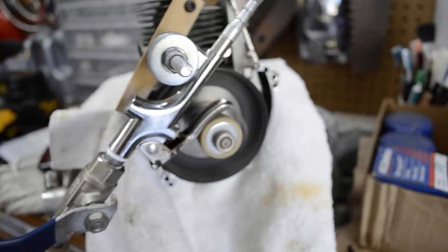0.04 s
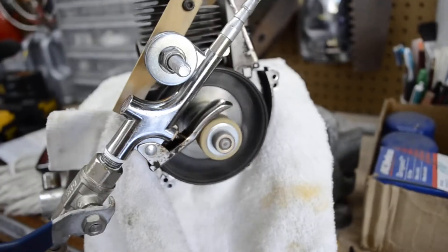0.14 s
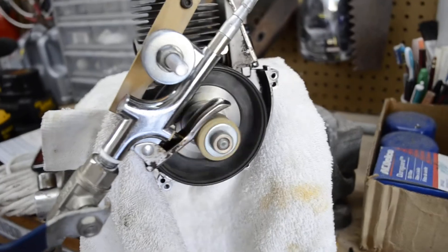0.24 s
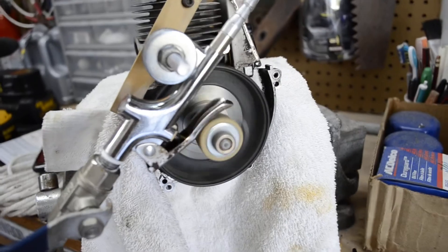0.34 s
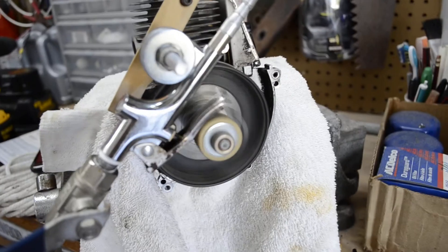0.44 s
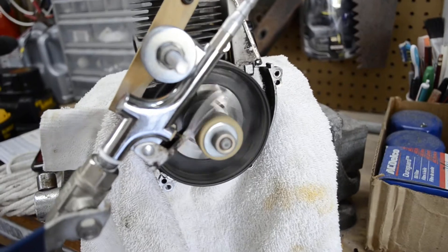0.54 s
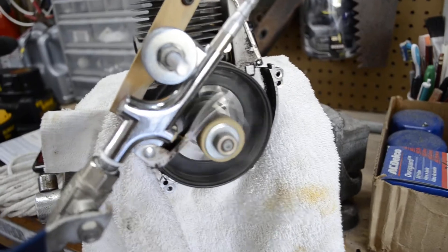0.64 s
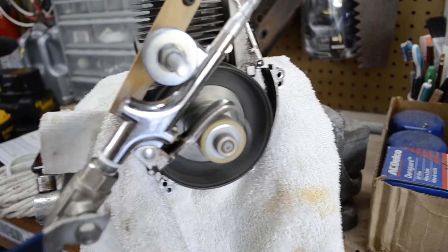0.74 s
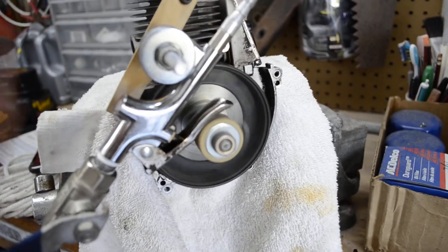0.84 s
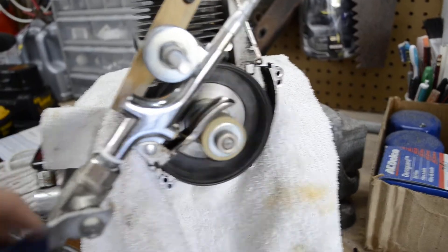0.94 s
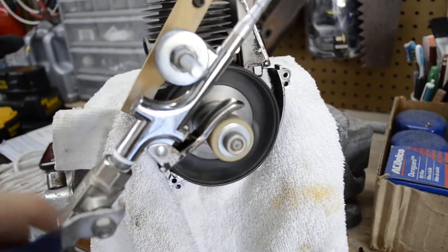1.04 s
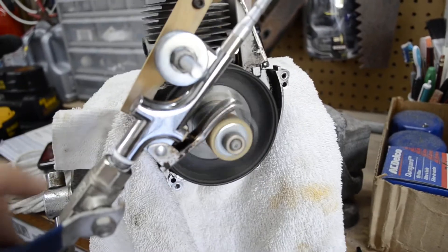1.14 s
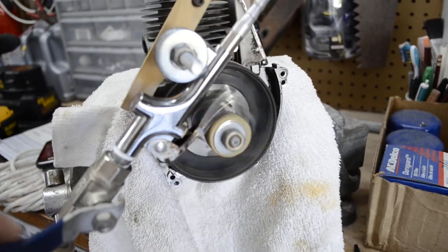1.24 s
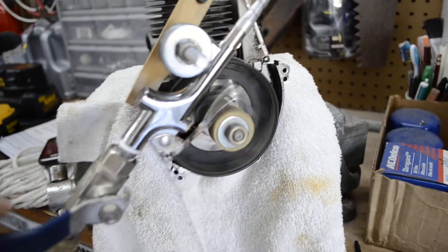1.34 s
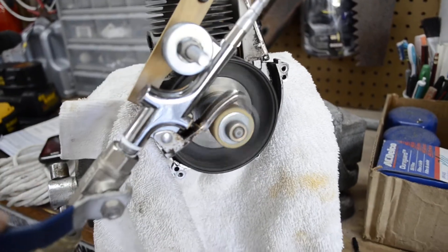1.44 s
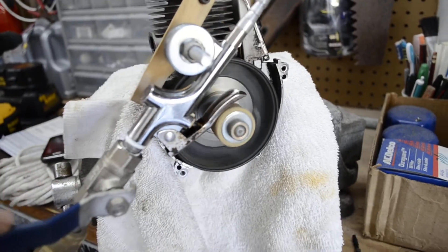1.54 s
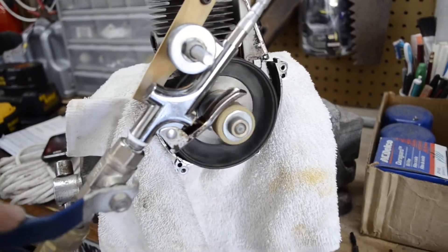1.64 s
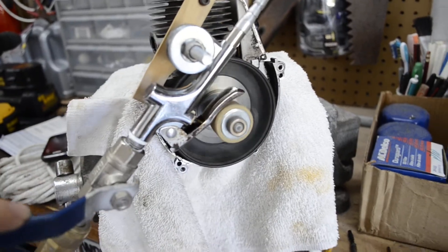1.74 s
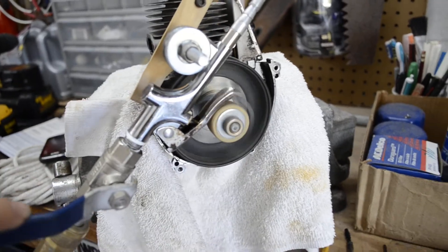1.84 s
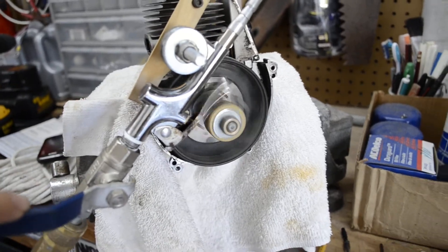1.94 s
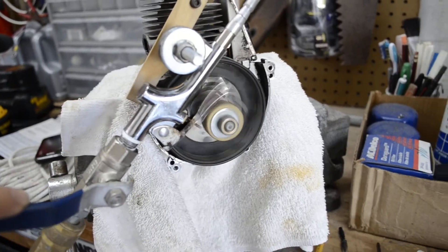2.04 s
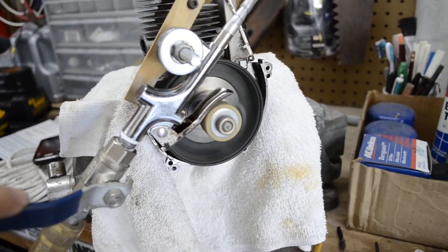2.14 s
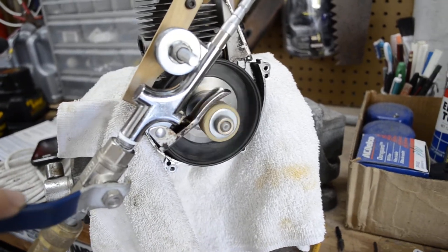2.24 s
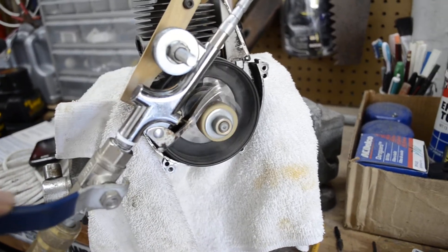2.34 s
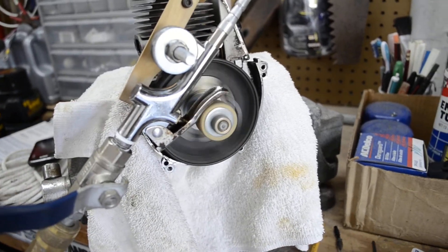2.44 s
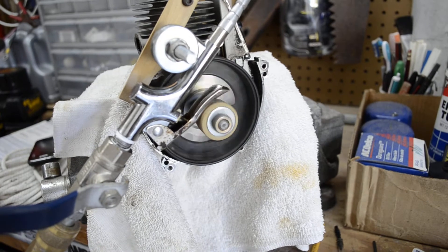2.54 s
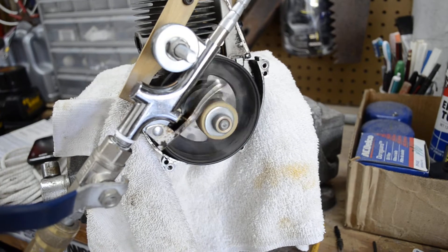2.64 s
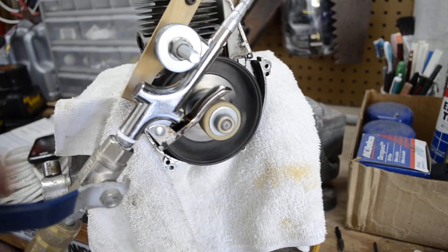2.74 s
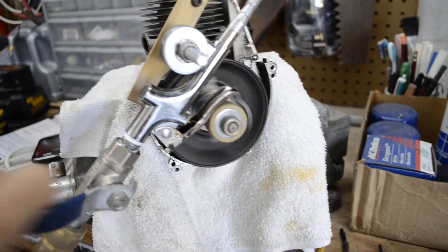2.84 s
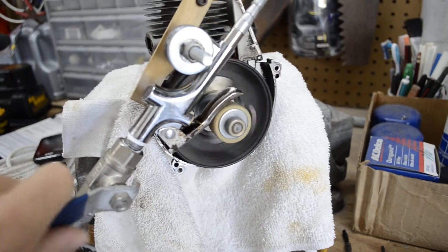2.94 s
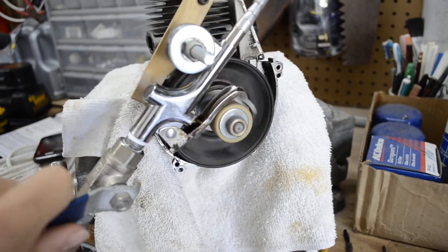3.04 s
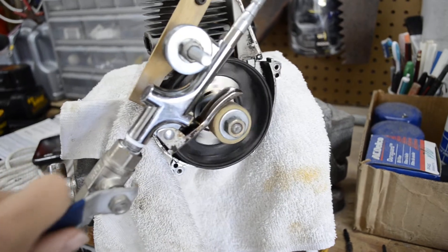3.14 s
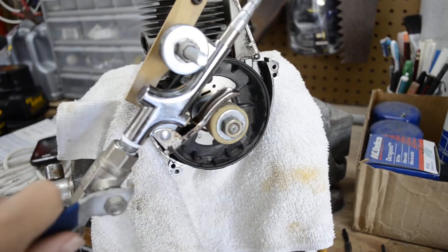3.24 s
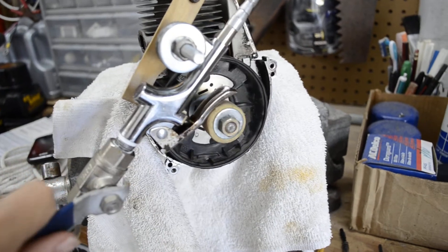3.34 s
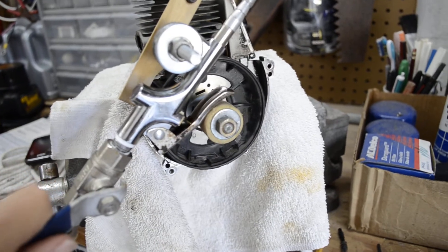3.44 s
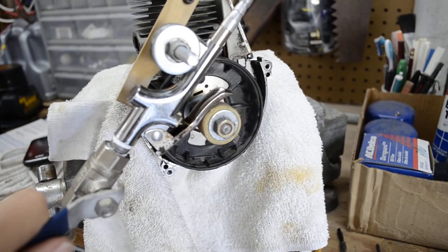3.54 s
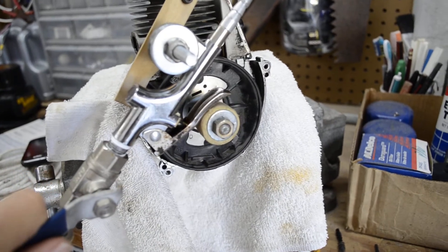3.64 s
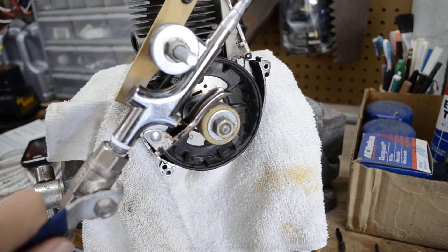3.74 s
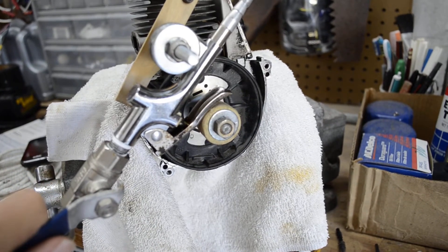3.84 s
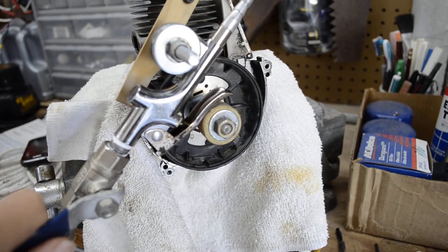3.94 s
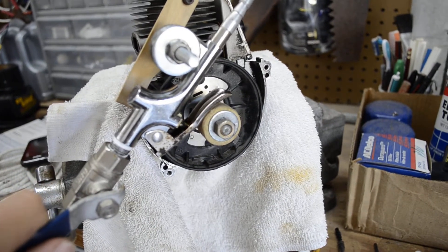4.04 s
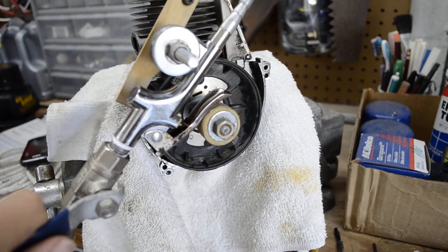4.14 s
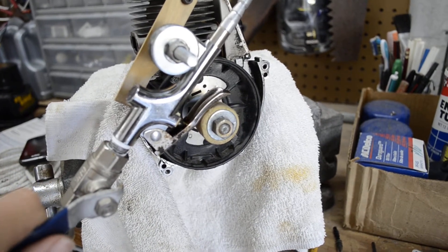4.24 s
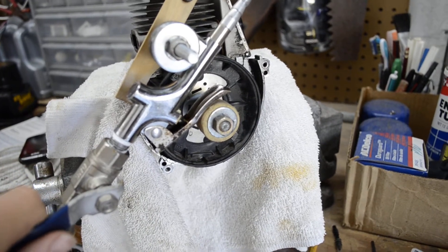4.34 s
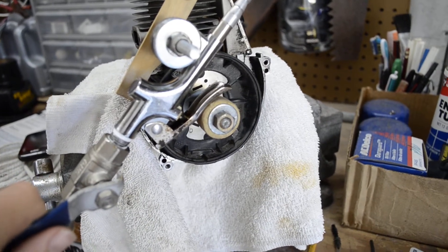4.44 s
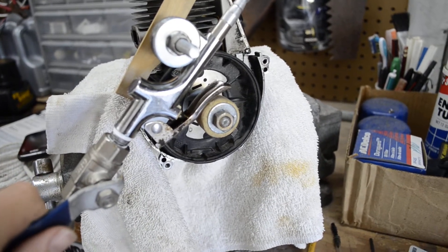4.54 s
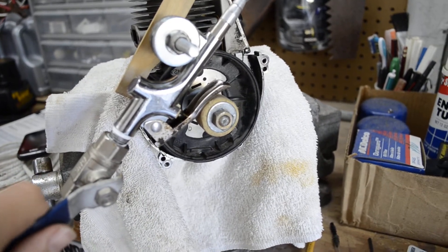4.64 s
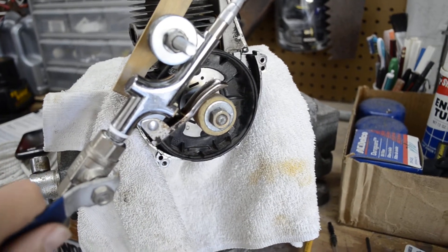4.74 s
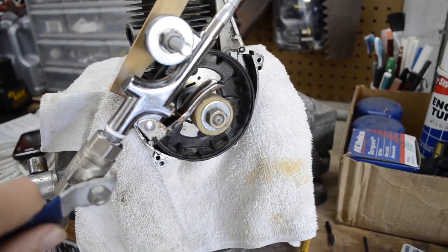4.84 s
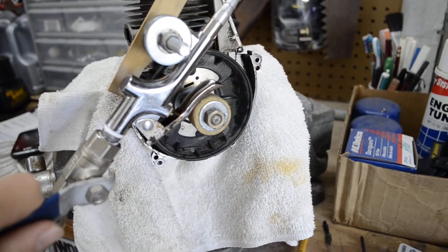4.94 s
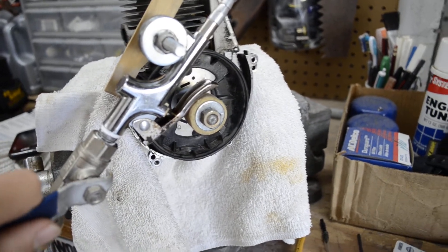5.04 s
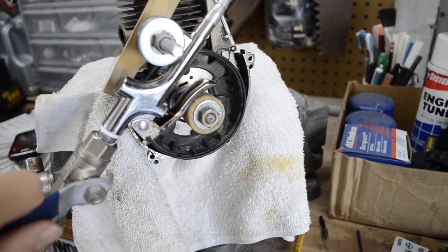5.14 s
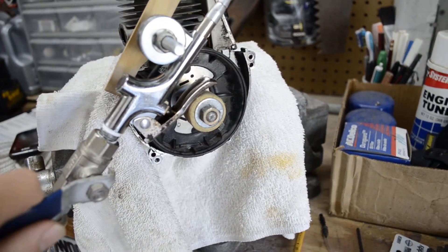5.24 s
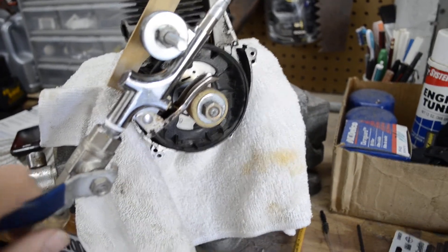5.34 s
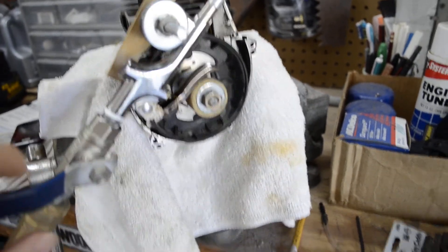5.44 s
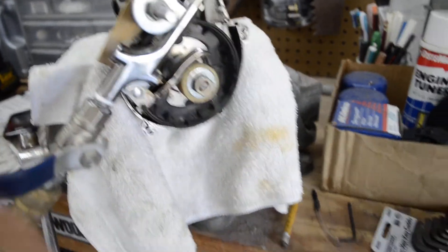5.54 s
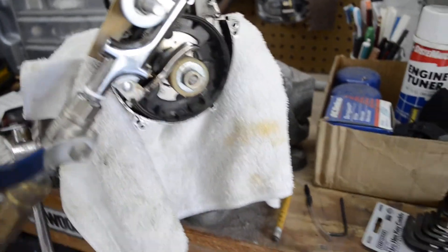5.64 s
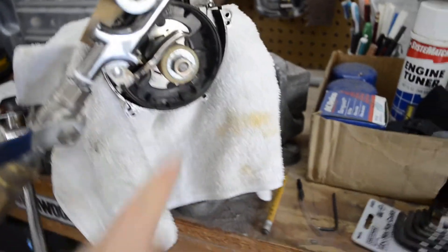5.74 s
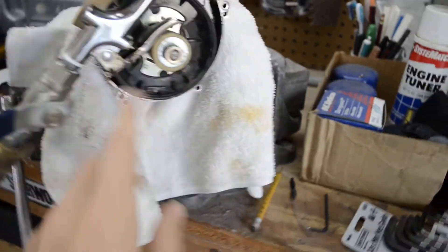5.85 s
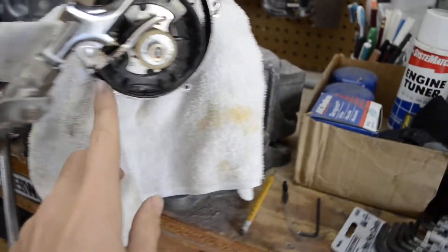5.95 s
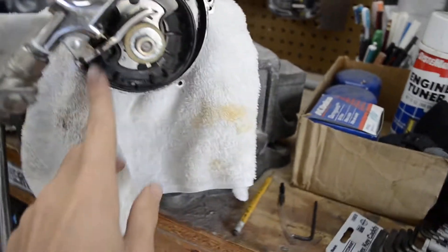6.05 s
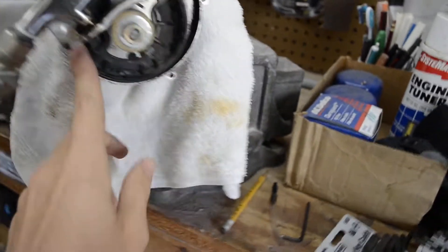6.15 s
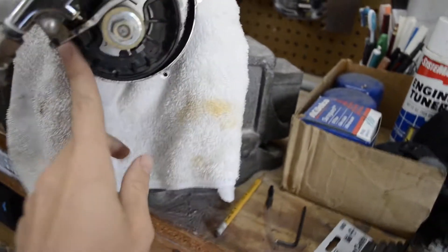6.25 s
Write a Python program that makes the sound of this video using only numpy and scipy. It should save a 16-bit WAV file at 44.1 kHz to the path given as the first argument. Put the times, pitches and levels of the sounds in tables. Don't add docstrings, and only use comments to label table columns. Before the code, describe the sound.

Very close in a small workshop, a little air-driven piston engine runs at about seventeen loud pops a second, each a burst of air with a hollow thump. Near two and a half seconds it weakens and slows, puffs a few last times and stalls. A steady bright hiss of leaking air follows to the end, over a faint hum.

```python
import sys
import numpy as np
from scipy import signal
from scipy.fft import rfft, irfft
from scipy.io import wavfile
from scipy.ndimage import uniform_filter1d

SR = 44100
rng = np.random.default_rng(int(sys.argv[2]) if len(sys.argv) > 2 else 0)


def voltage_ratio(level):
    return 10 ** (np.asarray(level, float) / 20)


def to_wav(sig):
    pcm = np.clip(np.atleast_2d(sig), -1, 1) * 32767
    pcm = np.round(pcm).astype(np.int16)
    wavfile.write(sys.argv[1], SR, pcm.T)


N = 277830


def coloured(x, points, pipes=()):
    hz = np.fft.rfftfreq(len(x), 1 / SR)
    point_hz, point_db = np.transpose(points)
    db = np.interp(np.log(hz + 1), np.log(point_hz + 1), point_db, left=-70, right=-70)
    for centre, width, lift in pipes:
        db = db + lift / (1 + (2 * (hz - centre) / width) ** 2)
    gain = voltage_ratio(db)
    return irfft(rfft(x) * gain / np.sqrt(np.mean(gain ** 2)), len(x))


def flutter(hz, db):
    slow = signal.lfilter(*signal.butter(2, hz, fs=SR), rng.standard_normal(N))
    return voltage_ratio(db * slow / slow.std())


def swell(starts, dbs, rises, holds, fall):
    out = np.zeros(N)
    for start, db, hold, rise in np.broadcast(starts, dbs, holds, rises):
        first = max(round(start * SR), 0)
        last = min(round((start + hold + 9 * fall) * SR), N)
        at = np.arange(first, last)
        t = np.maximum(at / SR - start, 0)
        out[at] += voltage_ratio(db) * (1 - np.exp(-t / rise)) * np.exp(-np.maximum(t - hold, 0) / fall)
    return out


def gusts(points, envelope, pipes=()):
    return coloured(rng.standard_normal(N), points, pipes) * envelope


def whistle(hz, width):
    noise = rng.standard_normal(N) + 1j * rng.standard_normal(N)
    narrow = signal.lfilter(*signal.butter(2, width / 2, fs=SR), noise)
    carrier = np.exp(2j * np.pi * np.cumsum(hz) / SR)
    return (narrow / narrow.std() * np.sqrt(2) * carrier).real


# (turn number, turn length [ms], inlet stays open after the dump [ms])
CRANK_TURNS = [
    (0, 58.19, 24.2),
    (33, 58.27, 24.5),
    (35, 59.69, 25.6),
    (38, 67.55, 32),
    (44, 79.76, 45.8),
    (46, 86.31, 57.4),
    (47, 92.78, 68.5),
    (48, 99.24, 148.2),
]
# (time [s], level [dB])
CYLINDER_PRESSURE = [
    (0, 0.5),
    (.6, 1.17),
    (1.05, 0.4),
    (2.05, -0.24),
    (2.4, -6),
    (2.76, -8),
    (2.94, -12.5),
    (3.035, -23.5),
]
# (time [s], level [dB])
MIC_AIM = [
    (0, -6.5),
    (.5, -3),
    (.9, -1.18),
    (1.9, 0.17),
    (2.2, -1),
    (2.35, -0.62),
    (2.6, 0.26),
]


def crank():
    number, length_ms, inlet_ms = np.transpose(CRANK_TURNS)
    turn = np.arange(int(number[-1]) + 1)
    odd = turn % 2
    length = np.interp(turn, number, length_ms)
    slow = length / length[0]
    drag = slow ** 1.5
    even_dump = -0.0089 + (np.cumsum(length) - length[0]) / 1000
    dump = even_dump + odd * 0.74 * slow ** 2 / 1000
    opens = dump - 3.75 * drag / 1000
    delay_ms = (4.808 + 0.1604 * rng.standard_normal(len(turn))) * drag
    shuts = even_dump + np.interp(turn, number, inlet_ms) / 1000
    pressure_db = np.interp(dump, *np.transpose(CYLINDER_PRESSURE))
    aim_db = np.interp(dump, *np.transpose(MIC_AIM))

    def level(even_db, odd_db, push, face, scatter_db):
        chance = scatter_db * rng.standard_normal(len(turn))
        return np.where(odd, odd_db, even_db) + push * pressure_db + face * aim_db + chance
    return opens, delay_ms, dump, shuts, level


# (frequency [Hz], density [dB per Hz])
SEEP_COLOUR = [(8500, -13.5), (9300, 5), (10000, 7), (10800, -17.5), (12500, -15.5)]
# (frequency [Hz], density [dB per Hz])
BLAST_COLOUR = [(300, -29.5), (800, -3.5), (1500, -3), (2500, -4.5), (3800, -8), (4800, -13.5), (5800, -22),
                (8300, -16), (10500, -8), (12500, -8.5), (15000, -10.5), (16000, -20.5)]
# (frequency [Hz], density [dB per Hz])
POP_COLOUR = [(300, 9.5), (800, -1.5), (1500, -4), (2500, 0.5), (3800, 1.5), (4800, -6), (5800, -16),
              (8300, -19), (10500, -44.5), (12500, -22.5), (15000, -38.5), (16000, -33.1)]
# (frequency [Hz], width [Hz], lift [dB])
PORT_THROAT = [(3966, 1200, 1.5), (10950, 1240, 1.5)]
# (time [s], extra pop level [dB])
UNEVEN_POPS = [(0, 11), (.11, 0), (.51, -7), (.75, 1), (1.5, 6), (1.56, 4.5), (1.73, -2), (1.8, 2.5),
               (2.03, -7.5), (2.09, 1.5), (2.16, -21.5), (2.52, 9.5), (2.6, 3.5), (2.67, 7.5), (2.76, -17),
               (2.84, -6)]


def exhaust(opens, delay_ms, level):
    blast_db = level(even_db=-16, odd_db=-15.5, push=0.3029, face=0.9959, scatter_db=2.14)
    pop_db = level(even_db=-9.5, odd_db=-9.5, push=1.73, face=-0.16, scatter_db=-1.02)
    seep_db = level(even_db=-47.5, odd_db=-52.5, push=0.25, face=-1.28, scatter_db=-9)
    seep_db = np.minimum(seep_db, -29)
    for at, extra_db in UNEVEN_POPS:
        pop_db[np.argmin(abs(opens - at))] += extra_db
    pop = opens + delay_ms / 1000

    lead = 0.11 * np.diff(opens, prepend=2 * opens[0] - opens[1])
    seep = gusts(SEEP_COLOUR, swell(opens - lead, seep_db, 0.00075, lead, 0.0024))

    blast_hold = np.minimum(1.008 * delay_ms, 6.6) / 1000
    blast_envelope = swell(opens, blast_db, 0.00103, blast_hold, 0.004) * flutter(520, 0.89)
    blast = gusts(BLAST_COLOUR, blast_envelope, PORT_THROAT)

    crack_envelope = swell(pop - 0.0008, pop_db + 2.5, 0.000275, 0.000308, 0.001283)
    crack = gusts(POP_COLOUR, crack_envelope, PORT_THROAT)
    tail_envelope = swell(pop, pop_db - 7.0, 0.00089, 0.00091, 0.00369) * flutter(646, 2.25)
    tail = gusts(POP_COLOUR, tail_envelope)

    chuff_db = level(even_db=-22, odd_db=-27, push=0.23, face=-1.35, scatter_db=1.5)
    chuff = whistle(np.full(N, 3946), width=343)
    chuff = chuff * swell(opens, chuff_db, 0.00133, 1.496 * delay_ms / 1000, 0.00091)

    air = seep + blast + crack + tail + chuff
    return signal.lfilter(*signal.butter(3, 800, "high", fs=SR), air)


# (place [round trips], depth [ratio], width [ms])
PIPE_DIPS = [
    (-0.785, 0.496, 0.338),
    (0.145, 1.377, 0.3445),
    (1.205, 0.788, 0.537),
    (2.09, 0.1245, 0.234),
]
# (delay [s], level [dB])
BENCH_ECHOES = [
    (0.0103, -15.5),
    (0.013, -23.5),
    (.024, -12),
    (0.038, -13),
    (0.048, -25.5),
]


def thump(dump, dump_db):
    turn = np.diff(dump, prepend=2 * dump[0] - dump[1])
    round_trip = turn / 17.205
    t = np.arange(-1000, 2000) / SR
    out = np.zeros(N + SR)
    for at, db, trip in zip(dump, dump_db, round_trip):
        slow = (trip / 0.00343) ** 0.476
        wave = 0.59 / slow ** 1.07 * np.exp(-((t / trip - 0.35) / 1.043) ** 2)
        for place, depth, width in PIPE_DIPS:
            from_dip_ms = (t - place * trip) * 1000
            wave -= depth * slow ** place * np.exp(-0.5 * (from_dip_ms / (width * slow ** 1.42)) ** 2)
        bass_loss = np.clip(3.08 * (trip / 0.00357 - 1), 0, 0.8)
        wave -= bass_loss * uniform_filter1d(wave, size=300)
        notch_hz = 460 * (0.003524 / trip) ** 0.34
        wave = signal.lfilter(*signal.iirnotch(notch_hz, 4.0, fs=SR), wave)
        wave = wave - 0.5 * signal.lfilter(*signal.iirpeak(0.5804 / trip, 4.5, fs=SR), wave)
        ring = signal.lfilter(*signal.iirpeak(2.208 / trip, 13.0, fs=SR), wave)
        wave = wave + 0.578 / slow ** 9.7 * ring
        out[round(at * SR) + 1000:][:3000] += voltage_ratio(db + 3.5) * wave
    for hz, sharpness, share in [(790, 12.9, 1.06), (1012, 14.0, 1.36)]:
        out = out + share * signal.lfilter(*signal.iirpeak(hz, sharpness, fs=SR), out)
    taps = np.zeros(4000)
    taps[0] = 1
    for delay, db in BENCH_ECHOES:
        taps[round(delay * SR)] = voltage_ratio(db)
    out = signal.oaconvolve(out, taps)
    return signal.lfilter(*signal.butter(3, 78, "high", fs=SR), out)[2000:][:N]


# (frequency [Hz], density [dB per Hz])
RUSH_COLOUR = [(150, -13.5), (500, -20.5), (800, -10.5), (1200, -4), (1600, -13.5), (2250, -15.5),
               (3460, -19), (5300, -12), (6300, -29), (6900, -18), (8300, -32), (10100, -20), (12900, -27),
               (15800, -27.5)]
# (frequency [Hz], width [Hz], lift [dB])
INLET_PIPES = [(4920, 74, -14), (7430, 368, 3), (12900, 500, -7), (13600, 300, 12), (14900, 300, 8)]
# (nearly shut [Hz], wide open [Hz], width [Hz],
# level against the rush [dB], lift when shut [dB], growth [dB per dB of pressure lost])
INLET_WHISTLES = [(3878, 5050, 497, -5, 3.46, 0.5561), (1028, 1210, 187, -11.5, -13, -0.89),
                  (9260, 10050, 450, -17.5, -4.5, 2)]
# (frequency [Hz], density [dB per Hz])
TICK_COLOUR = [(300, -12), (800, -18), (1500, -2.5), (2500, -5.5), (3800, -9.5), (4800, -42), (5800, -2.5),
               (8300, -18.5), (10500, -5), (12500, -10.5), (15000, -13.5), (16000, -34.5)]
# (frequency [Hz], density [dB per Hz])
PUFF_COLOUR = [(300, -1), (800, -37), (1500, -11.5), (2500, -2.5), (3800, 5), (4800, 0), (5800, -9),
               (8300, -10.5), (10500, -5), (12500, -13.5), (15000, -13), (16000, -47.0)]
# (time [s], puff level [dB])
STALL_PUFFS = [
    (2.808, -28),
    (3.006, -29.5),
    (3.031, -22.5),
    (3.185, -28),
    (3.204, -24.5),
]


def valve(opens, shuts, level):
    tick_db = level(even_db=-53, odd_db=-21.5, push=1.36, face=1.24, scatter_db=4)
    puff_db = level(even_db=-32, odd_db=-26, push=0.41, face=-0.03, scatter_db=3)
    rush_db = level(even_db=-28.5, odd_db=-28.5, push=0.0838, face=-0.27, scatter_db=1.49)
    stay = shuts - opens
    t = np.arange(N) / SR

    flow = swell(opens + 0.00246, rush_db, 0.0636 * stay, stay - 0.003, 0.00138) * flutter(205, 0.43)
    rush = gusts(RUSH_COLOUR, voltage_ratio(-1.0) * flow, INLET_PIPES)

    marks = np.ravel([opens, opens + 0.2 * stay, opens + 0.86 * stay, shuts + 0.004], "F")
    opening = np.interp(t, marks, np.tile([0, 1, 1, 0], len(shuts)))
    sunk_db = np.clip(-np.interp(t, *np.transpose(CYLINDER_PRESSURE)), 0, 4)
    for shut_hz, open_hz, width, db, fade, growth in INLET_WHISTLES:
        whistle_db = db + fade * (1.5 - opening) + growth * sunk_db
        hz = shut_hz + (open_hz - shut_hz) * opening
        rush = rush + voltage_ratio(whistle_db) * flow * whistle(hz, width)

    tick = gusts(TICK_COLOUR, swell(shuts, tick_db + 4.0, 0.000071, 0.000332, 0.003))
    puff_envelope = swell(shuts, puff_db + 6.0, 0.00534, 0.121 * stay, 0.00446) * flutter(260, 0.67)
    puff = gusts(PUFF_COLOUR, puff_envelope, PORT_THROAT)
    rock_envelope = swell(*np.transpose(STALL_PUFFS), 0.00124, 0.00784, 0.0053)
    rock = gusts(PUFF_COLOUR, rock_envelope, PORT_THROAT)
    return rush + tick + puff + rock


def room(x):
    t = np.arange(SR // 2) / SR
    decay = voltage_ratio(-60 * t / 0.2105)
    tail = rng.standard_normal(len(t)) * decay * (t > 0.004)
    tail = signal.lfilter(*signal.butter(1, 5000, fs=SR), tail)
    return signal.fftconvolve(x, tail / np.linalg.norm(tail))[:N]


# (frequency [Hz], density [dB per Hz])
CASE_COLOUR = [(150, -2.5), (300, 3.5), (600, 0), (1100, 5.5), (1800, -0.5), (2700, -1), (3600, -15),
               (4500, -6), (5500, -14), (7000, -11.5), (8500, -10.5), (10000, -8), (13000, -5.5),
               (15800, -14.5)]


def case():
    envelope = swell([0], [-38.5], 0.0015, 3.04, 0.038)
    return gusts(CASE_COLOUR, envelope * flutter(180, 3.87))


# (frequency [Hz], density [dB per Hz])
SHOP_COLOUR = [(20, -13.5), (45, -4.5), (90, -3), (200, -7.5), (400, -8), (1000, -8)]
# (frequency [Hz], level [dB])
MAINS_HUM = [
    (59.2, -74),
    (118.4, -60),
    (349.9, -60.5),
]


def shop():
    t = np.arange(N) / SR
    hum = np.zeros(N)
    for hz, db in MAINS_HUM:
        hum += voltage_ratio(db) * np.sqrt(2) * np.sin(2 * np.pi * hz * t) * flutter(3.7, 2.6)
    return hum + voltage_ratio(-53) * coloured(rng.standard_normal(N), SHOP_COLOUR)


# (time [s], level [dB], treble over that level [dB])
LEAK_COURSE = [
    (3.19, -27, 0.5),
    (3.21, -33, -9),
    (3.26, -30, -5.5),
    (5.0, -30.5, -5),
    (5.9, -30.5, -6),
    (6.15, -30.5, -10),
    (6.3, -30, -10),
]
# (frequency [Hz], density [dB per Hz])
LEAK_LOW = [(150, -38.5), (250, -19.5), (450, -19.5), (770, -4.5), (1560, -5.5), (3400, -9), (5000, -4.5),
            (5400, -8.5), (5700, -18.5), (6300, -25.5), (6600, -8.5), (8400, -22.5), (9100, -14.5),
            (9800, -17), (10100, -42.5)]
# (frequency [Hz], density [dB per Hz])
LEAK_HIGH = [(9400, -40), (9750, -18), (10400, 0), (10620, -8), (10850, -1), (11300, -8), (11600, -7),
             (12000, -11), (13000, -18), (13350, -15), (13600, 0), (14250, -13), (14900, -3), (15400, -6),
             (15750, -14)]
# (frequency [Hz], width [Hz], lift [dB])
LEAK_PIPES = [(886.3, 101, -6), (1242, 11.7, 10.5), (1334, 21.7, 5.5), (1523, 180, 5), (1669, 28, 0.5),
              (1761, 36, 8), (2296, 36, 4.5), (2671, 152, 4), (3737, 40, 8.5), (4187, 78, 7.5),
              (4640, 70, 3.5), (5056, 94, 4), (5114, 13.7, 11)]


def leak():
    course_s, course_db, treble_db = np.transpose(LEAK_COURSE)
    t = np.arange(N) / SR
    low = coloured(rng.standard_normal(N), LEAK_LOW, LEAK_PIPES)
    high = coloured(rng.standard_normal(N), LEAK_HIGH) * voltage_ratio(np.interp(t, course_s, treble_db))
    onset = np.clip((t - 3.17) / 0.0575, 0, 1)
    return (low + high) * flutter(30, 0.298) * voltage_ratio(np.interp(t, course_s, course_db)) * onset


def scene():
    opens, delay_ms, dump, shuts, level = crank()
    air = exhaust(opens, delay_ms, level) + valve(opens, shuts, level)
    dump_db = level(even_db=-11, odd_db=-11.5, push=1, face=0, scatter_db=0.8)
    engine = air + voltage_ratio(-15.5) * room(air) + thump(dump, dump_db) + case()
    engine = engine - 0.764 * signal.lfilter(*signal.iirpeak(930, 8.0, fs=SR), engine)
    return (engine + leak() + shop())[None]


def low_pass(x):
    return signal.sosfilt(signal.butter(12, 16640, fs=SR, output="sos"), x)


def record(dry):
    band_limit = signal.firwin(1023, 15740, window=("kaiser", 9), fs=SR)
    mix = np.clip(signal.oaconvolve(dry, band_limit[None], "same"), -1, 1)
    return low_pass(mix)


dry = scene()
out = record(dry)
to_wav(out)
```